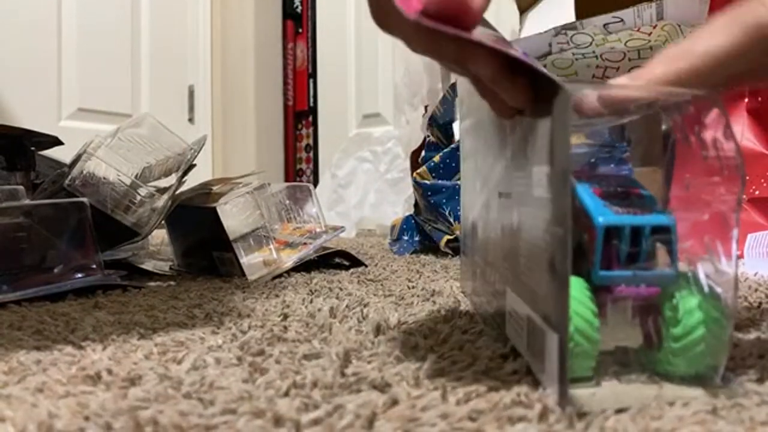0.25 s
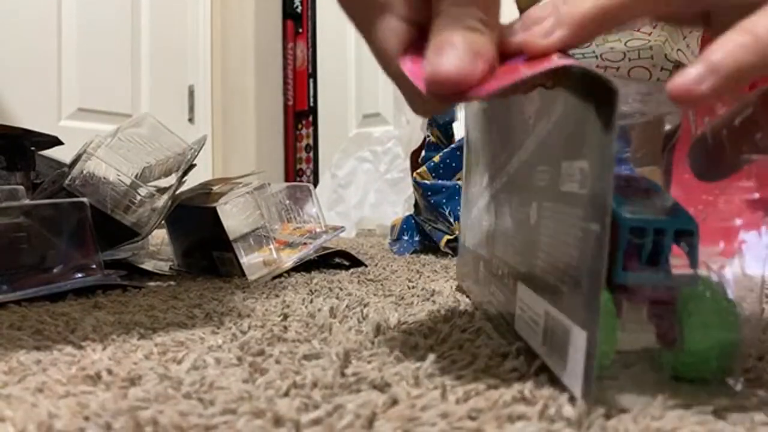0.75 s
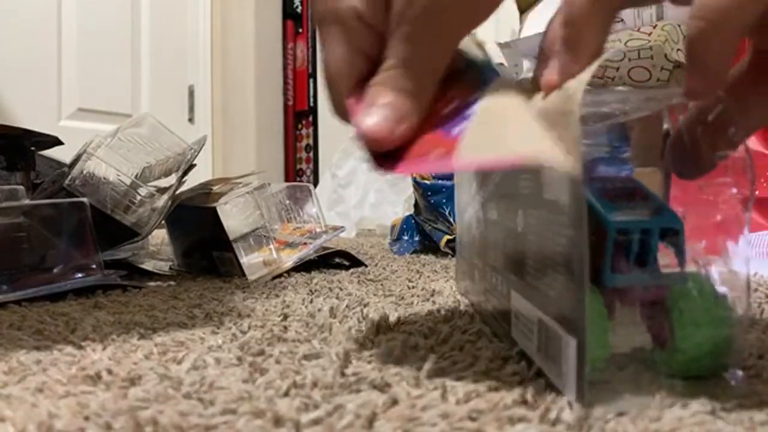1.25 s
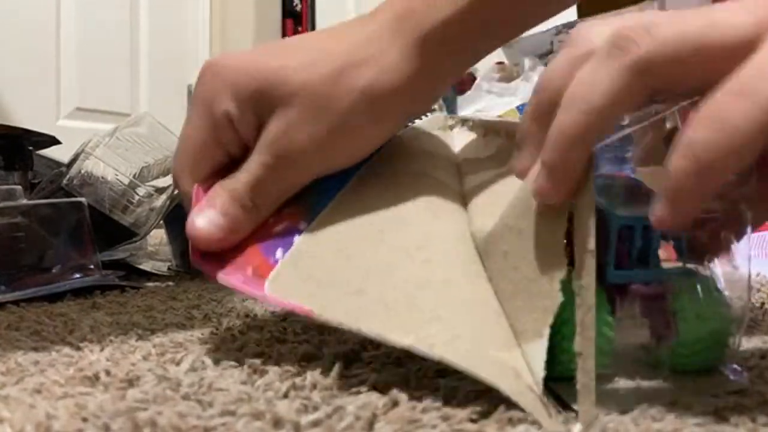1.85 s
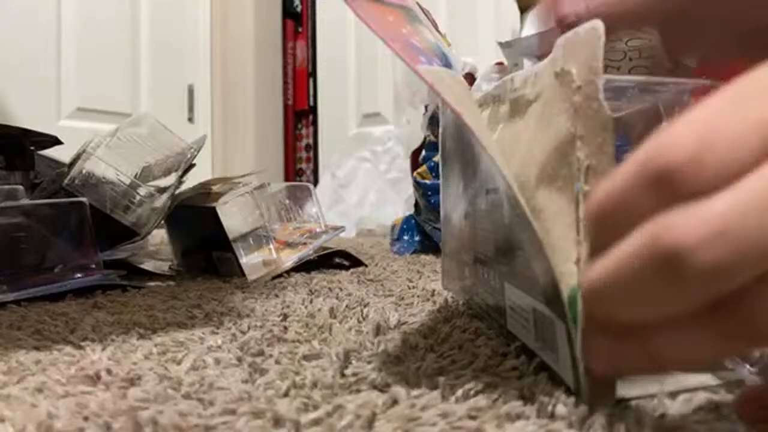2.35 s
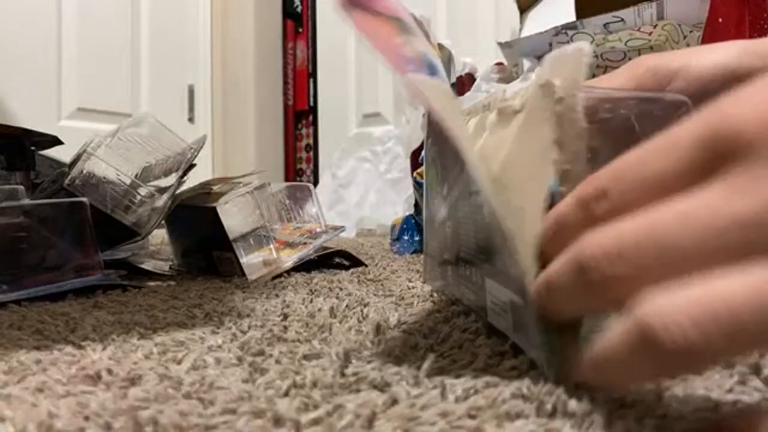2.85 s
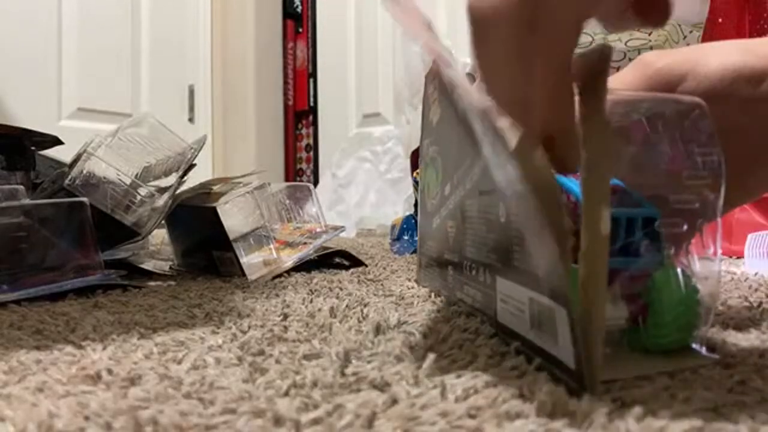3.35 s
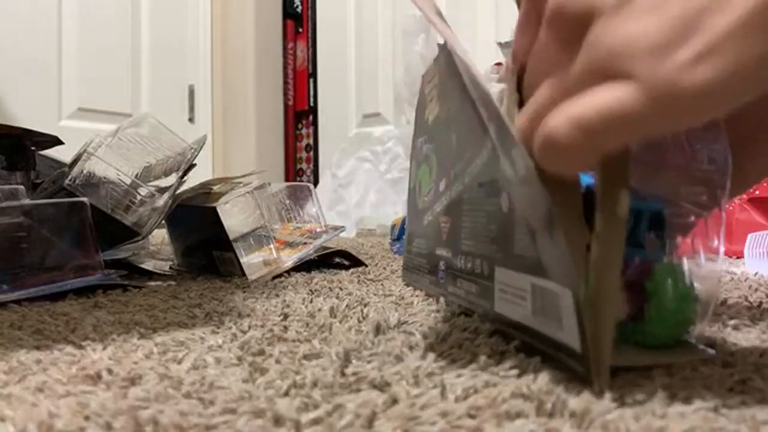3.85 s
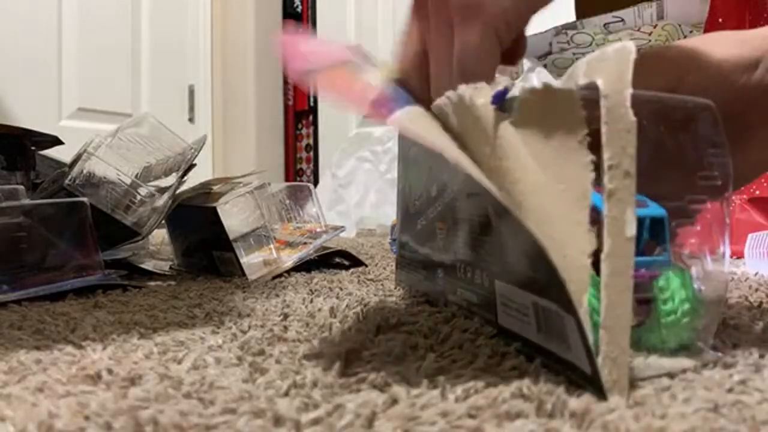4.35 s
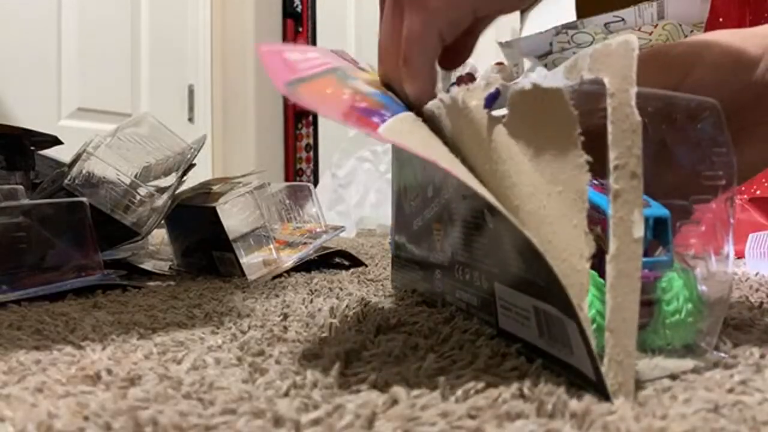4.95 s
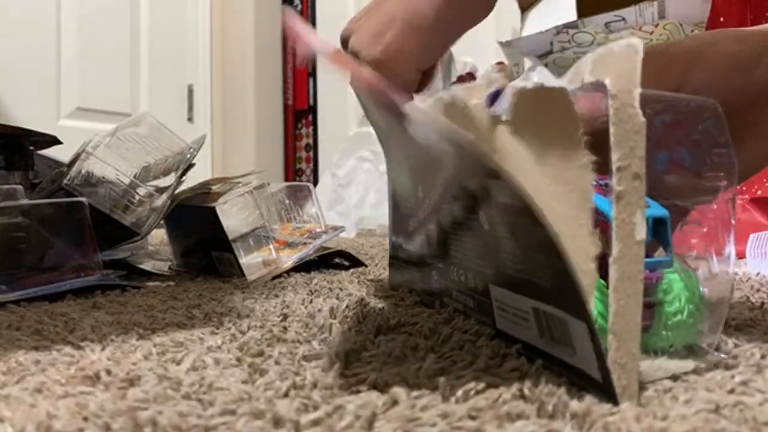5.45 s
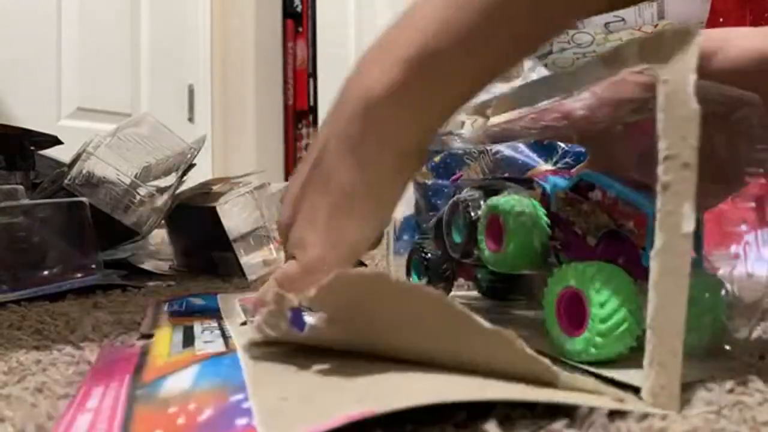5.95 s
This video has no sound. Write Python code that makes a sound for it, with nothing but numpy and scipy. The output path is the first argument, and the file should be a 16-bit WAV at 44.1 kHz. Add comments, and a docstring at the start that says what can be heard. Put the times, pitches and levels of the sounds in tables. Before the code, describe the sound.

Close, dry peeling of cardboard off a plastic blister: crackling rips, hard snaps, low flexing thumps and small creases over faint hiss.

```python
"""A softly answering room with a carpet: hands peel the card off a plastic toy pack, close to a phone's microphone.
Faint hum and hiss lie behind. Rips are noise: tiny snaps for paper fibres, a rumble for the flexing card,
a scrape for the shell, with decaying sines for small creases. Buckles are jolts of noise through stiff-sheet
responses: crack, knock and hollow thump, each with a brief room wash. Swells of tone add thuds and short pings."""
import sys
import numpy as np
from scipy import signal
from scipy.fft import rfft, irfft, next_fast_len
from scipy.io import wavfile
from scipy.ndimage import uniform_filter1d, minimum_filter1d, map_coordinates

SR = 44100
rng = np.random.default_rng(int(sys.argv[2]) if len(sys.argv) > 2 else 0)


def put_to_file(sound):
    """Save the sound as 16-bit audio at rate SR, in the file named by the first command-line argument."""
    columns = np.atleast_2d(sound).T  # one column per channel
    safe = np.clip(columns, -1, 1)
    whole_steps = np.round(safe * 32767)
    wavfile.write(sys.argv[1], SR, whole_steps.astype(np.int16))


N = 272979  # length [samples]


def amp(db):
    """Gain of a level in dB."""
    return 10 ** (np.asarray(db) / 20)


def unit(x):
    """x at rms 1."""
    return x / np.sqrt(np.mean(x ** 2) + 1e-20)


def along(points, hz):
    """Values at hz, read between (frequency, value) points on a log axis."""
    f, v = np.transpose(points)
    return np.interp(np.log(hz + 1), np.log(f + 1), v)


def wobble(rate):
    """A smooth random curve with `rate` knots a second."""
    knots = rng.standard_normal(int(N * rate / SR) + 4)
    return map_coordinates(knots, [np.arange(N) * rate / SR])


def filtered(x, response):
    """x times a complex response of frequency, zero-padded so that tails have room."""
    n = x.shape[-1]
    m = next_fast_len(2 * min(n, SR // 4) + n)
    return irfft(rfft(x, m) * response(np.fft.rfftfreq(m, 1 / SR)), m)[..., :n]


def resonance(f, centre, width):
    """Response of one damped mode, 1 at its centre; all in Hz."""
    return 1j * f * width / (centre ** 2 - f * f + 1j * f * width)


def overlay(rows, start):
    """Sums short events, one a row, from their start samples."""
    where = start + np.arange(rows.shape[1])
    return np.bincount(where.ravel(), rows.ravel(), N + SR)[:N]


def crackle(spectrum, spiky_db, clump_db, clumps):
    """Dense snaps of uneven size that come in clumps, their colour shifting in patches, at rms 1."""
    sizes = amp(spiky_db * rng.exponential(size=N) + clump_db * wobble(clumps))
    z = signal.stft(sizes * rng.standard_normal(N), nperseg=256)[2]
    patches = uniform_filter1d(rng.standard_normal(z.shape), size=7, axis=0)
    patches = uniform_filter1d(patches, size=8, axis=1)
    ragged = signal.istft(z * amp(clump_db * unit(patches)), nperseg=256)[1][:N]
    return unit(filtered(ragged, lambda hz: amp(along(spectrum, hz))))


# Colour of room hum and microphone noise: (frequency [Hz], relative density [dB per Hz])
AIR = [(95, -6.5), (120, 5), (150, -8.5), (500, -20.5), (5000, -37.5), (10000, -26.5), (16000, -32.5)]


def background():
    """Room hum and microphone noise: faint coloured noise that wavers slowly."""
    return amp(-48) * crackle(AIR, spiky_db=4.0, clump_db=-2.5, clumps=4.46)


def bursts(table, cycles, sag):
    """Short swells of tone, a few cycles wide, whose pitch sags by a share per cycle."""
    s, db, hz = np.transpose(table)[:, :, None]
    t = np.arange(-SR // 20, SR // 20) / SR
    turns = t * hz
    swell = np.exp(-(2 * turns / cycles) ** 2)
    phase = turns - sag * turns ** 2 / 2 + rng.random(s.shape)
    rows = amp(db) * swell * np.sin(2 * np.pi * phase)
    where = ((s + t) * SR).round().astype(int)
    return np.bincount(where.ravel(), rows.ravel(), N)[:N]


# The whole card snaps into a new bend: (loudest at [s], peak of the swell [dB], pitch there [Hz])
THUDS = [(.93, -20, 170), (1.335, -22, 195), (1.772, -27, 104), (1.904, -24.5, 101), (3.212, -33, 80),
         (3.365, -30, 115), (3.773, -26.5, 150), (4.133, -26.5, 94), (4.361, -23.5, 113), (4.392, -22, 120),
         (4.542, -21, 101), (5.421, -25, 183), (5.54, -21.5, 150)]


def thuds():
    """A sheet jumping to a new bend gives under two cycles of low, sagging tone."""
    return bursts(THUDS, cycles=1.6, sag=0.28)


# Short ringing tones, some of them within a buckle's snap:
# (loudest at [s], peak of the swell [dB], pitch [Hz])
PINGS = [(4.18, -25.5, 1650), (4.36, -29, 1720), (4.372, -10, 3700)]


def pings():
    """Short ringing tones at a steady pitch, each a swell some six cycles wide."""
    return bursts(PINGS, cycles=5.9, sag=0)


CREASES_PER_S, CREASE_HZ, CREASE_Q = 180, 1090, 2.6  # pitches spread around CREASE_HZ
CREASE_DB = -2.5  # smallest click, over the gain of the shell's scrape


def creases(shell):
    """Small folds click as decaying sines at random moments and pitches, as hard as the shell is pulled."""
    when, size, pitch = rng.random((1200, 3)).T[:, :, None]
    at = np.cumsum(-np.log(1 - when), axis=0) / CREASES_PER_S  # random gaps
    hz = CREASE_HZ * 2 ** (3 * pitch - 1.3)
    t = np.arange(SR // 50) / SR
    start = np.minimum(at * SR, N - 1).astype(int)
    inside = at * SR < N
    gain = inside * shell[start] * amp(CREASE_DB - 2.9 * np.log(1 - size))
    ring = np.exp(-t * hz / CREASE_Q * np.pi) * np.sin(2 * np.pi * hz * t)
    return overlay(gain * ring, start)


# Each rip of the card, levels before the jerks:
# (full strength at [s], build-up [s], hold [s], fibres [dB], card [dB], shell [dB])
RIPS = [(0.097, 0.17, 0.11, -55, -39.5, -57), (0.796, 0.093, 0.1, -42.5, -40, -45),
        (0.9, 0.015, 0.0091, -25.5, -24.5, -42), (1.143, 0.11, 0.12, -27, -43, -45),
        (1.27, 0.039, .12, -24.5, -32.5, -35.5), (1.482, 0.068, 0.095, -21, -42.5, -29.5),
        (1.752, 0.15, 0.077, -35.5, -48, -40), (2.019, 0.11, 0.12, -36, -42.5, -44.5),
        (2.229, 0.11, 0.036, -41.5, -50.5, -63), (2.376, 0.36, 0.031, -42.5, -44.5, -41.5),
        (2.597, 0.39, .01, -45, -40.5, -45), (2.701, 0.021, 0.019, -40.5, -35, -37),
        (2.886, 0.1, 0.14, -39, -40.5, -42), (3.15, 0.052, 0.017, -30.5, -35, -37.5),
        (3.344, 0.041, 0.0084, -27, -36, -40), (3.428, 0.024, 0.067, -37, -40, -48.5),
        (3.564, 0.062, 0.12, -39, -41, -49.5), (3.756, 0.021, 0.012, -19.5, -24.5, -29.5),
        (4.048, 0.35, 0.017, -24, -28, -35), (4.089, .03, 0.091, -27.5, -34.5, -41),
        (4.238, 0.04, 0.11, -44, -60, -50), (4.372, 0.17, 0.0079, -28, -38.5, -37),
        (4.483, 0.021, 0.052, -29.5, -27.5, -35), (4.6, 0.036, 0.11, -41, -41, -47.5),
        (4.94, 0.46, 0.034, -44.5, -43, -54), (5.076, .07, 0.22, -38.5, -49.5, -51.5),
        (5.401, 0.049, 0.011, -25.5, -26.5, -34.5), (5.5, .03, 0.058, -36.5, -36.5, -48.5),
        (5.64, 0.08, 0.019, -25, -24.5, -29), (5.737, 0.024, 0.025, -44.5, -30, -37),
        (5.895, 0.034, 0.029, -44, -46.5, -50)]
# After a rip lets go: (fibres [dB/s], card [dB/s], shell [dB/s])
FADE_DB_PER_S = [280, 228, 298]
# Rustle in hands that only hold the pack: (fibres [dB], card [dB], shell [dB])
RUSTLE_DB = [-59, -57, -71]
BUILD_DB = 20  # a rip climbs this far during its build-up


def pull():
    """Gains of fibres, card and shell: every rip builds up, holds and fades over a faint rustle."""
    s, build, hold, *levels = np.transpose(RIPS)[:, :, None]
    late = np.arange(0, N / SR + .01, .002) - s  # time after full strength
    rising = BUILD_DB * np.minimum(late, 0) / np.maximum(build, .005)
    past = np.maximum(late - np.abs(hold), 0)
    gains = []
    for db, fade, rest in zip(levels, FADE_DB_PER_S, RUSTLE_DB):
        power = np.sum(amp(db + rising - fade * past) ** 2, axis=0) + amp(rest) ** 2
        gains.append(np.interp(np.arange(N) / SR, late[0] + s[0], np.sqrt(power)))
    return gains


# Snapping fibres, lifted near 10 kHz by the microphone port: (frequency [Hz], relative density [dB per Hz])
FIBRE = [(1200, -28), (3000, -15.5), (4500, -18.5), (6000, -15), (8520, -0.5), (9940, 4.5), (12800, -5),
         (14900, -4.5), (16000, -11)]


def tear(gain, jerk):
    """Paper fibres break one after another: a bright hiss of tiny snaps."""
    return gain * amp(0.53 * jerk) * crackle(FIBRE, spiky_db=2.6, clump_db=2.6, clumps=170)


# The flexing card: (frequency [Hz], relative density [dB per Hz])
CARD = [(30, -36), (113, -7), (208, 5.5), (276, -8.5), (442, 4.5), (727, -14), (1170, -19), (1980, -120)]
CARD_LAG_S = 0.009  # the card answers a rip a little after the fibres


def flex(gain, jerk):
    """The broad card bends and rumbles low."""
    lagging = np.roll(gain, round(CARD_LAG_S * SR))
    return lagging * amp(1.0 * jerk) * crackle(CARD, spiky_db=0.6, clump_db=2.5, clumps=35)


# The plastic shell: (frequency [Hz], relative density [dB per Hz])
SHELL = [(350, -6.5), (700, -7.5), (950, -2.5), (1760, -11), (2040, -14), (3440, -19.5), (5000, -25),
         (6500, -33), (11000, -120)]


def scrape(gain, jerk):
    """The plastic shell rubs in a rough midrange scrape."""
    return gain * amp(1.5 * jerk) * crackle(SHELL, spiky_db=2.5, clump_db=2.5, clumps=150)


def handling():
    """The pull tears fibres, flexes the card, and scrapes and creases the shell."""
    fibres, card, shell = pull()
    jerk = wobble(60)  # the tear advances in small jerks that shake card and shell too
    return tear(fibres, jerk) + flex(card, jerk) + scrape(shell, jerk) + creases(shell)


# Reverberation of the soft room: (frequency [Hz], time to fall 60 dB [s])
ROOM = [(150, 0.33), (1000, 0.11), (14000, 0.16)]


def room(rows, noise):
    """The room answers each pop with a diffuse wash of its colour; each frequency dies at its own speed."""
    frames = dict(fs=SR, nperseg=384, noverlap=288)
    hz, t, z = signal.stft(noise, **frames)
    energy = np.sum(np.abs(signal.stft(rows, **frames)[2]) ** 2, axis=2, keepdims=True)
    dying = amp(-60 * t / along(ROOM, hz)[:, None]) * (t > .008)
    level = np.sqrt(energy / np.sum(dying ** 2, axis=1, keepdims=True))
    wash = z / np.sqrt(np.mean(np.abs(z) ** 2)) * dying * level
    return signal.istft(wash, **frames)[1][:, :rows.shape[1]]


def bending(f):
    """Bending waves travel at a speed that grows as the root of frequency: high notes arrive first."""
    return np.exp(-2j * np.pi * 0.1321 * np.sqrt(f))


def thump(jolt, thump_hz):
    """A hollow resonance, 170 Hz wide; the broad card follows, its lowest notes last."""
    def response(f):
        card = 0.22 * amp(along(CARD, f)) * np.exp(-2j * np.pi * 0.603 * np.log(1 + f))
        hollow = resonance(f, thump_hz, 170) + card
        return bending(f) * hollow / (1 + (f / 900) ** 2)
    return filtered(jolt, response)


SHELL_MODES_HZ = [950, 1216, 1687]  # facet resonances of the shell: (pitch [Hz])
MODE_WIDTH, MODE_SCATTER_DB = 0.12, 5  # width over pitch; each knock stirs the modes unevenly
BRITTLE_DB = 0.4172  # tilt per octave of the knock, for each dB of crack over knock


def knock(jolt, knock_db, crack_db):
    """The shell's facets ring; a sharp crack brightens the knock, a soft fold dulls it."""
    stirred = amp(MODE_SCATTER_DB * rng.standard_normal((len(jolt), len(SHELL_MODES_HZ))))
    tilt_db = BRITTLE_DB * np.clip(crack_db - knock_db + 16.5, -25, 25)

    def response(f):
        facet = 0.57 + sum(g[:, None] * resonance(f, c, MODE_WIDTH * c)
                           for c, g in zip(SHELL_MODES_HZ, stirred.T))
        colour = amp(along(SHELL, f) + tilt_db * np.log2(1 + f / 1000))
        return bending(f) * colour * facet
    return filtered(jolt, response)


def crack(jolt):
    """The crack has the bright colour of snapping fibres and no bending delay."""
    return filtered(jolt, lambda f: amp(along(FIBRE, f)))


# Buckles of card and shell, levels as peaks of each part:
# (start [s], knock [dB], thump [dB], crack [dB], thump pitch [Hz])
POPS = [(.047, -49, -34.5, -22, 370), (.088, -18, -12.5, -9.5, 486), (0.176, -40.5, -32, -47, 437),
        (.198, -56, -30, -12, 475), (.313, -40, -33, -34.5, 450), (0.325, -51, -26.5, -33, 205),
        (0.357, -34, -26, -32.5, 378), (0.455, -34.5, -27, -29, 430), (0.739, -54.5, -45, -18, 167),
        (.774, -55, -26, -23.5, 220), (.905, -35, -16, -4, 440), (.937, -49, -18, -34, 480),
        (.961, -51, -23, -35, 437), (1.124, -6.5, -7.5, -44, 450), (1.276, -8.5, -45, -13, 720),
        (1.351, -20, -35, -19.5, 634), (1.483, -7, -15.5, -21, 520), (1.498, -8, -23, -6.5, 570),
        (1.527, -5.5, -1.5, -11, 437), (1.572, -3, -17, -8.5, 510), (1.643, -21.5, -20, -16, 460),
        (1.736, -39, -20.5, -17.5, 505), (1.75, 3.5, -1, -2, 516), (1.853, -21, -28, -35, 400),
        (1.972, -46.5, -23.5, -29, 385), (2.001, 4, -3, 1, 467), (2.546, -11.5, -12, -38, 450),
        (2.619, -32, -12.5, -42.5, 410), (2.721, -13.5, -2.5, -13, 382), (2.759, -27, -24, -21.5, 509),
        (2.903, -10.5, -13, -28, 495), (2.947, -21, -23.5, -14, 337), (3.043, -27.5, -14.5, -17, 570),
        (3.049, -26, -6, -10.5, 427), (3.469, -41.5, -26, -33, 342), (3.508, -43, -25, -48, 410),
        (4.036, -18.5, -21.5, -13, 500), (4.101, -30.5, -23, -10.5, 169), (4.205, -17, -27.5, -29.5, 384),
        (4.337, -23.5, -22.5, -15, 454), (4.37, -11, -12.5, 0.5, 626), (4.467, -30, -38, -14, 500),
        (4.478, -4.5, 0.5, -3, 490), (4.589, -20.5, -17.5, -35, 364), (4.661, -15, -6, -12.5, 500),
        (4.676, -17, -10.5, -18, 493), (5.039, -33.5, -35, -29, 237), (5.207, -31, -26, -32, 386),
        (5.593, -22.5, -7, -18.5, 670), (5.661, -10.5, -10.5, -14.5, 430), (5.737, -11, -14, -35, 383),
        (5.786, -22, -24, -25, 450), (5.941, -31.5, -23.5, -31, 567), (6.001, -29.5, -21.5, -29, 386),
        (6.109, -36.5, -51, -25, 188)]


def pops():
    """A buckle cracks, then its bending wave arrives: high notes first, the low thump last."""
    s, knock_db, thump_db, crack_db, thump_hz = np.transpose(POPS)[:, :, None]
    t = np.arange(SR // 3) / SR
    noise = rng.standard_normal((len(POPS), 4, len(t)))
    slips = rng.standard_normal((len(POPS), len(t) // 70))
    broken = amp(3.5 * np.repeat(slips, 70, axis=1))  # a buckle lets go in uneven slips

    def jolt(k, t60, rise=0.00065):
        return noise[:, k] * broken * amp(-60 * t / t60) * (1 - np.exp(-t / rise))

    crack_s = np.clip(0.021 * amp(0.32 * knock_db), .003, .03)  # a small buckle cracks in one short tick
    knock_s = 0.028 * amp(0.15 * knock_db)
    parts = [(thump(jolt(0, 0.037), thump_hz), thump_db),
             (knock(jolt(1, knock_s), knock_db, crack_db), knock_db),
             (crack(jolt(2, crack_s, rise=0.2 * crack_s)), crack_db)]
    rows = sum(amp(db) * p / np.abs(p).max(axis=1, keepdims=True) for p, db in parts)
    rows = rows + amp(-11.5) * room(rows, noise[:, 3])
    return overlay(rows, (s * SR).round().astype(int))


def scene():
    """The pack in the hands, close by, over a quiet background."""
    return (background() + thuds() + pings() + handling() + pops())[None]


TOP_HZ = 15900  # the phone's band limit


def record(dry):
    """The phone cuts deep bass, turns its gain down for the highest peaks and keeps nothing above TOP_HZ."""
    bass_cut = signal.sosfilt(signal.butter(6, 56, "highpass", fs=SR, output="sos"), dry)
    needed = np.minimum(1, .94 / (np.abs(bass_cut) + 1e-9))
    gain = uniform_filter1d(minimum_filter1d(needed, size=90), size=45)  # a limiter that looks 1 ms ahead
    return filtered(gain * bass_cut, lambda hz: hz < TOP_HZ)


dry = scene()
out = record(dry)
put_to_file(out)
```